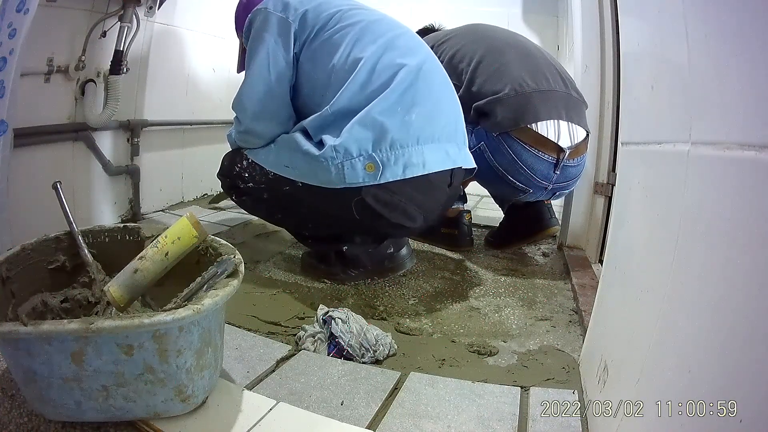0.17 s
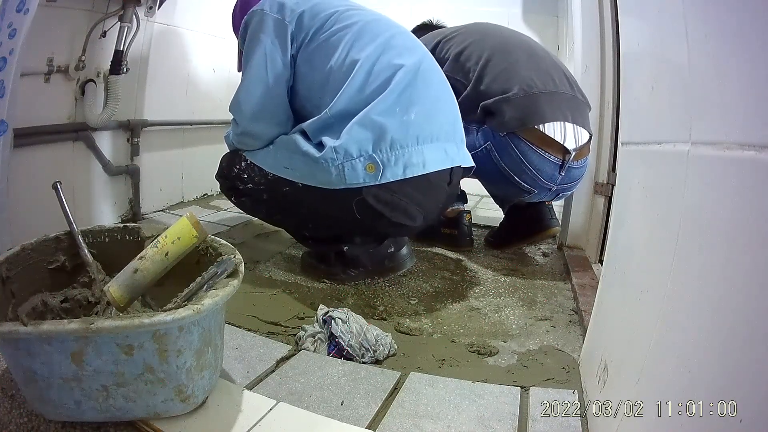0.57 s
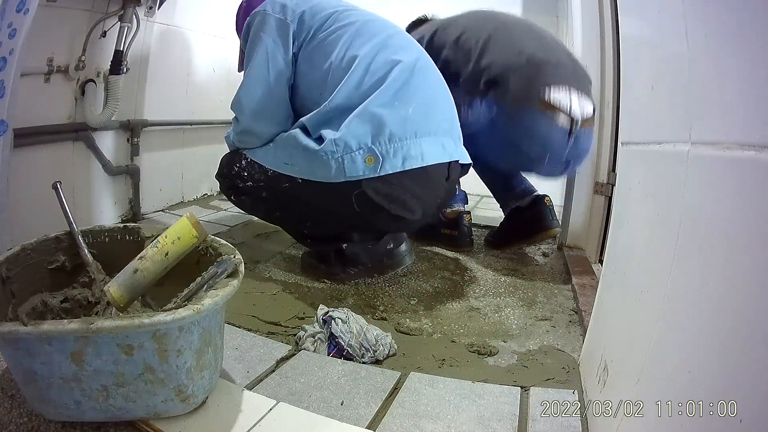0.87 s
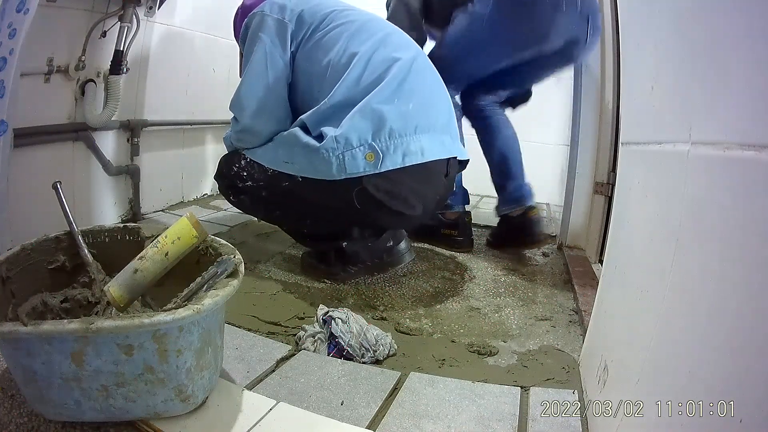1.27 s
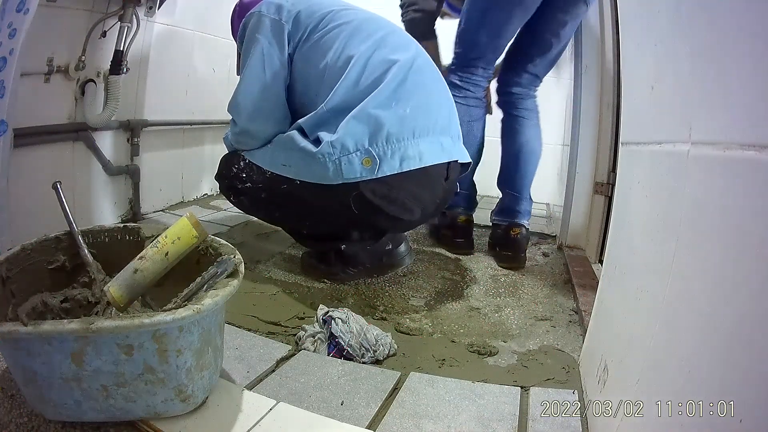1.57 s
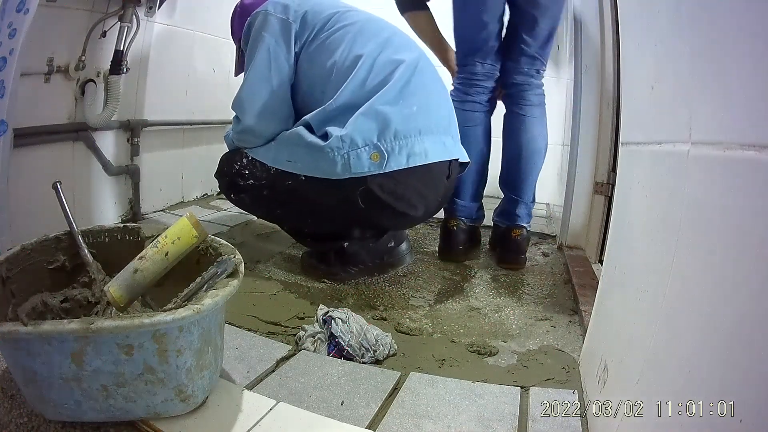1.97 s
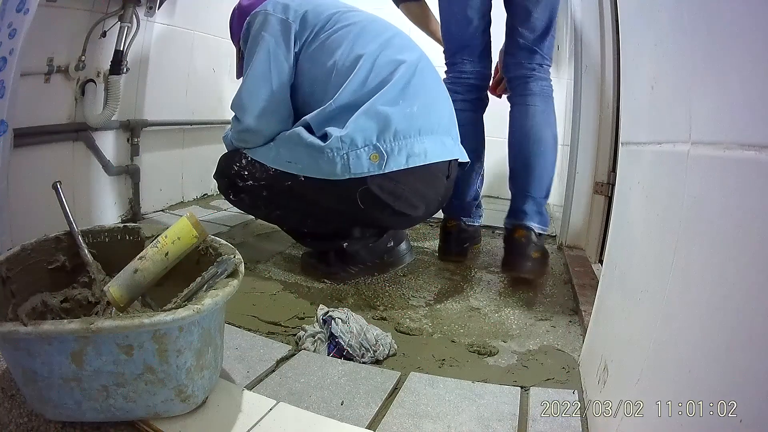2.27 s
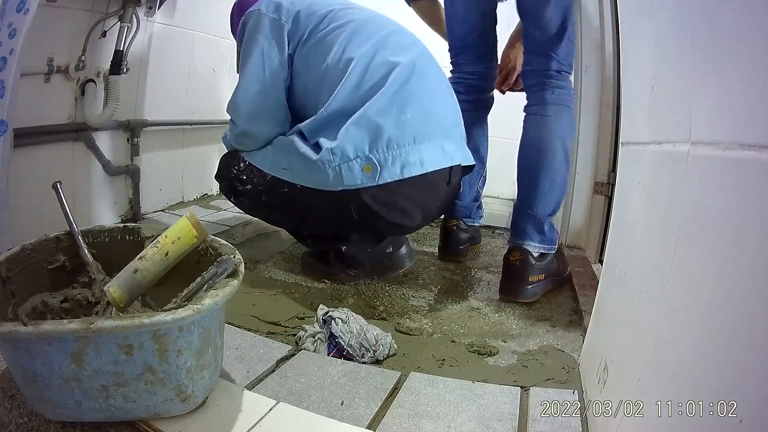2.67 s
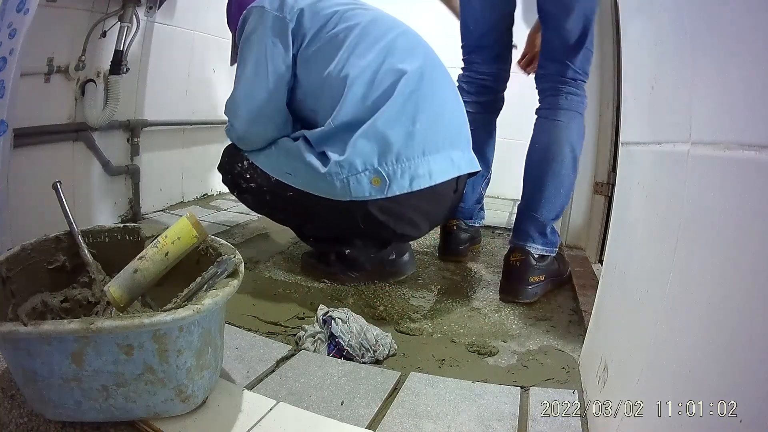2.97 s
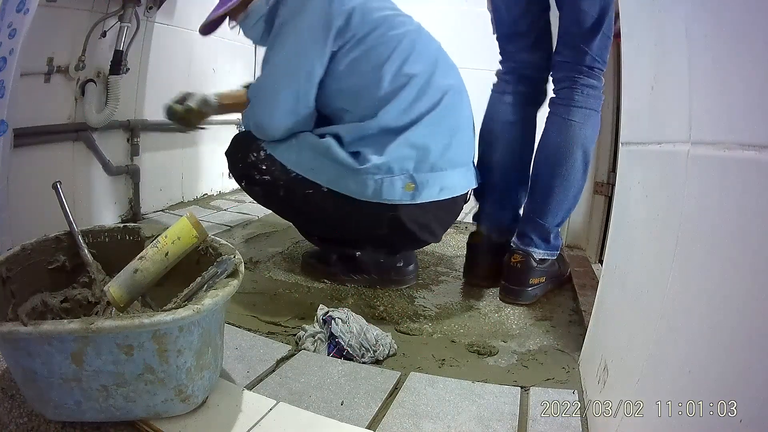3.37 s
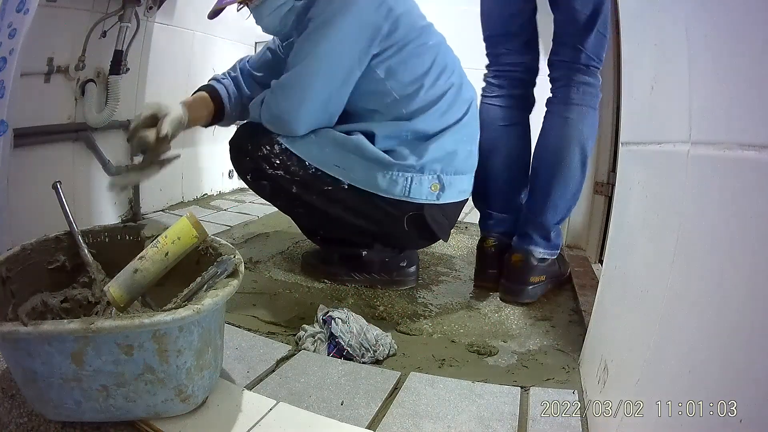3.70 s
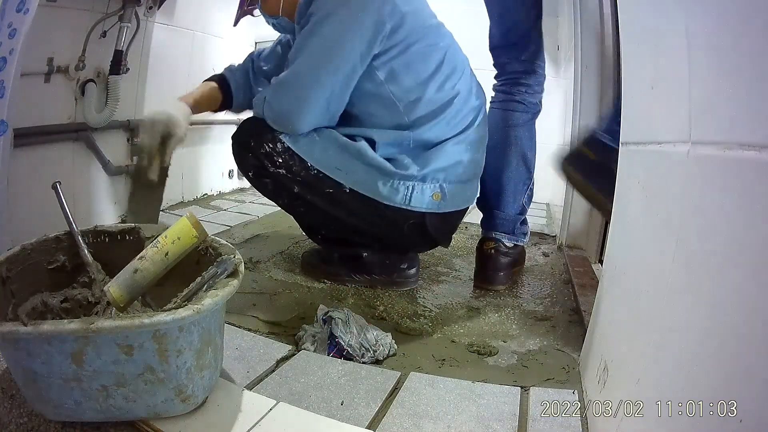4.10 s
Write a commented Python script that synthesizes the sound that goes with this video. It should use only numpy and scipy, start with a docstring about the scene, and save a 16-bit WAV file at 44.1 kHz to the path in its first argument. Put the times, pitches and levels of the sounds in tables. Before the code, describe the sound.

Low distant machine drone with a slightly unsteady hum. Close by, a trowel blade rasps over sandy wet cement in three strokes with pauses, hissing and faintly ringing. A soft double thud of a shoe comes after the second stroke. After a quiet gap, shoes knock, scuff and crackle on grit at the end. Short bright tile reflections, boxy small microphone, faint high electronic whine.

```python
"""A machinery drone and a faint brush of the edge; then three sweeps of a steel trowel over wet mortar,
in a small tiled room. Shoes tap, grit ticks, and a sole drags over sand near the end.
Grain noise drives blade, bed and sole resonances; damped modes and noise make the contacts.
The drone is shaped noise, standing-wave bands and two narrow low hums of wandering level and pitch.
A small camera adds its housing colour, a thin electronic whine and hiss."""
import sys
import numpy as np
from scipy import signal
from scipy.fft import rfft, irfft, next_fast_len
from scipy.io import wavfile
from scipy.ndimage import uniform_filter1d, map_coordinates

SR = 44100
rng = np.random.default_rng(int(sys.argv[2]) if len(sys.argv) > 2 else 0)


def bounce(signal):
    """Save signal as a 16-bit WAV file at the path given by the first command-line argument."""
    frames = np.transpose(np.atleast_2d(signal))
    limited = np.clip(frames, -1, 1)
    pcm = np.round(limited * 32767).astype(np.int16)
    wavfile.write(sys.argv[1], SR, pcm)


def level_to_linear(level):
    """Convert decibel levels to linear amplitude factors, elementwise."""
    exponent = np.asarray(level, float) / 20
    return 10 ** exponent


N = 186939
T = np.arange(N) / SR
FULL_DB = -32  # grit level at full pressure


def unit(x):
    """x at rms 1."""
    return x / np.sqrt(np.mean(x ** 2) + 1e-20)


def along(points, hz):
    """Interpolate (f/Hz, value) points on a log frequency axis."""
    f, v = np.transpose(points)
    return np.interp(np.log(hz + 1), np.log(f + 1), v)


def wobble(rate_hz):
    """Smooth random curve with rate_hz knots a second."""
    knots = rng.standard_normal(int(N * rate_hz / SR) + 4)
    return map_coordinates(knots, [T * rate_hz])


def filtered(x, response):
    """x times a complex response of frequency."""
    m = next_fast_len(N + SR // 2)
    return irfft(rfft(x, m) * response(np.fft.rfftfreq(m, 1 / SR)), m)[..., :N]


def coloured(x, spectrum):
    """x through a (f/Hz, level/dB) spectrum, rms 1."""
    return unit(filtered(x, lambda f: level_to_linear(along(spectrum, f))))


def resonances(modes):
    """Causal response of parallel (f/Hz, width/Hz, level/dB) modes."""
    return lambda f: sum(level_to_linear(db) * 1j * f * w / (c * c - f * f + 1j * f * w) for c, w, db in modes)


def gaussian(t_s, db, half_s):
    """Gaussian gain curve, down to 1/e at half_s from its peak."""
    return level_to_linear(db) * np.exp(-((T - t_s) / half_s) ** 2)


# far machinery spectrum: f/Hz, relative level/dB per Hz
DRONE_SPECTRUM = [(15, -22), (28, -12.5), (50, -40), (100, -14.5), (200, -23), (400, -21), (600, -27),
                  (780, -26.5), (1500, -28.5), (2100, -43), (4000, -53.5), (5300, -50.5), (5900, -102),
                  (9000, -94), (20000, -120)]
# room standing waves: f/Hz, width/Hz, level/dB rms
STANDING_WAVES = [(39.4, 6.3, -51.5), (69, 6.5, -43), (99.4, 2.4, -45.5), (120.6, 7.9, -43),
                  (222.6, 5.7, -46.5), (245.5, 8.6, -43), (295.3, 12, -51.5), (307.4, 10, -48),
                  (324.4, 26, -49.5), (414.7, 4.2, -51), (493.7, 7.1, -50), (544, 7.6, -49),
                  (607.3, 22, -51)]
# two narrow low hum bands, the strongest standing waves: f/Hz, resting level/dB
HUM_BANDS = [(155.8, -37.5), (173.5, -42.5)]
# chance level wander of resonance noise, lower then upper hum: peak t/s, level/dB, half length/s
HUM_LEVEL_WANDER = [
    [(.8, -33.5, 0.051), (1.17, -30, 0.053), (1.53, -31, 0.06), (2.0, -39.5, 0.18), (2.63, -27.5, 0.095),
     (3.12, -35.5, 0.085), (3.48, -34.5, 0.14), (3.95, -32, 0.26)],
    [(.4, -34, .05), (1.03, -30.5, 0.03), (1.23, -33, 0.097), (1.6, -33, 0.14), (2.5, -34, 0.23),
     (3.03, -32, 0.063), (3.29, -34, 0.068), (3.84, -29, 0.027), (4.09, -50, 0.035)],
]


def drone():
    """Far machinery: broad noise, noise in standing-wave bands, two low hums of wandering level and pitch."""
    far = level_to_linear(-39.0 + 2.2 * wobble(2.86)) * coloured(rng.standard_normal(N), DRONE_SPECTRUM)
    for hz, width_hz, db in STANDING_WAVES:
        far += level_to_linear(db) * unit(filtered(rng.standard_normal(N), resonances([(hz, width_hz, 0)])))
    for (hz, rest_db), wander in zip(HUM_BANDS, HUM_LEVEL_WANDER):
        level = level_to_linear(rest_db + 2.1 * wobble(11)) + sum(gaussian(*row) for row in wander)
        drift_hz = 1.063 * wobble(7)  # pitch wanders inside the resonance
        cycles = np.cumsum(hz + drift_hz) / SR + rng.random()
        far += level * np.sin(2 * np.pi * cycles)
    return far


# electronic hiss spectrum: f/Hz, relative level/dB per Hz
HISS_SPECTRUM = [(3000, -13), (7000, 8), (12000, -18), (15000, 5), (15700, -14)]


def hiss():
    """Electronic noise: steady shaped noise."""
    return level_to_linear(-79) * coloured(rng.standard_normal(N), HISS_SPECTRUM)


def whine():
    """Switching tone whose phase flips back and forth, with a weak steady octave."""
    whine_hz, flip_hz, flip_rad = 7322.4, 27.95, 1.23
    flip = flip_rad * np.tanh(12 * np.sin(2 * np.pi * (flip_hz * T + rng.random())))
    tone = level_to_linear(-65.5) * np.sin(2 * np.pi * whine_hz * T + flip)
    octave = level_to_linear(-85) * np.sin(4 * np.pi * whine_hz * T)
    return tone + octave


# camera housing modes: f/Hz, width/Hz, level/dB
HOUSING_MODES = [(1690, 580, -3), (2733, 460, 0), (4687, 930, 5.5), (6380, 340, 3), (8000, 660, -6),
                 (9600, 490, -8), (12100, 1300, -9)]


def housing(x):
    """The housing resonates in parallel with a direct path and a first-order low-pass path."""
    modes = resonances(HOUSING_MODES)
    return filtered(x, lambda f: level_to_linear(-3) / (1 + 1j * f / 6000) + .3 + modes(f))


# tile reverberation: f/Hz, t60/s
TILE_DECAY = [(200, 0.11), (2000, 0.25), (10000, 0.088)]


def room(x):
    """Tiled walls: a noise tail in which each frequency dies at its own speed."""
    hz, t, z = signal.stft(rng.standard_normal(SR // 2), SR, nperseg=256)
    decay = level_to_linear(-60 * t / along(TILE_DECAY, hz)[:, None])
    tail = signal.istft(z * decay, SR, nperseg=256)[1]
    delayed = np.pad(x, (150, 0))  # samples
    return signal.fftconvolve(delayed, tail / np.linalg.norm(tail))[:N]


def floor_bounce(x):
    """A delayed floor reflection, stronger with frequency, combs the treble."""
    comb_hz = 1650  # inverse delay
    return filtered(x, lambda f: 1 + 0.16 * np.exp(-2j * np.pi * f / comb_hz) * f / (f + 4000))


def contacts(events, sound, rise_s):
    """Each (t/s, level/dB, ..) event plays its own sound(t, ..) with a short rise."""
    out, t = np.zeros(N + SR), np.arange(SR // 4) / SR
    for t_s, db, *kind in events:
        out[round(t_s * SR):][:len(t)] += level_to_linear(db) * (1 - np.exp(-t / rise_s)) * sound(t, *kind)
    return out[:N]


def soft(x, cutoff_hz):
    """A soft contact passes little treble: third-order low-pass."""
    return filtered(x, lambda f: 1 / (1 + 1j * f / cutoff_hz) ** 3)


def tick(t, hz, t60_s):
    """A grain snaps: one damped mode and a noise crack, weaker in longer ringers."""
    t60_s = max(t60_s, .004)
    crack = level_to_linear(-3) * (.025 / t60_s) ** 2.4 * rng.standard_normal(len(t))
    return level_to_linear(-60 * t / t60_s) * (np.sin(2 * np.pi * hz * t) + crack)


# grit ticks: t/s, level/dB, f/Hz, t60/s
GRIT_TICKS = [(.2255, -44, 4900, 0.022), (1.068, -46, 3120, 0.027), (1.1234, -35, 3080, 0.027),
              (2.0473, -47, 2700, .028), (3.606, -48, 6300, .025), (3.7803, -42, 3060, 0.018),
              (3.8274, -56, 2460, .024), (3.861, -48, 5000, .02), (3.949, -46, 6540, .02),
              (4.0305, -34, 2870, 0.049), (4.031, -37.5, 4770, 0.046), (4.04, -32, 5050, 0.04)]


def ticks():
    """Single grains snap as short, bright damped modes."""
    return soft(contacts(GRIT_TICKS, tick, rise_s=0.0002), cutoff_hz=9050)


# floor modes: f/Hz, level/dB, t60/s at ring time factor 1
FLOOR_MODES = [(171, -6.5, 0.065), (285, 4, 0.061), (388, -2, 0.069), (500, 3.5, 0.039), (735, -1, 0.038),
               (983, 2.5, 0.051), (1283, -1, 0.031), (1587, 3, 0.033)]


def tap(t, hz, lasting):
    """Floor modes nearest the contact's hardness hz ring most, under a burst of noise."""
    db_per_octave, crack_db, crack_t60_s = 15, -2.5, 0.082
    u = t / max(lasting, .1)
    ring = 0
    for mode_hz, db, t60_s in FLOOR_MODES:
        off_db = db_per_octave * abs(np.log2(mode_hz / hz))
        ring += level_to_linear(db - off_db - 60 * u / max(t60_s, .004)) * np.sin(2 * np.pi * mode_hz * t)
    crack = level_to_linear(crack_db - 60 * u / crack_t60_s) * hz / 900 * rng.standard_normal(len(t))
    return ring + crack


# dull contacts: t/s, level/dB, strongest f/Hz (harder is higher), ring time factor
FLOOR_TAPS = [(1.065, -21, 417, 1.5), (1.7765, -12, 684, 0.55), (1.788, -17.5, 563, 0.42),
              (1.8, -30, 500, .5), (3.828, -26, 1200, 0.65), (3.829, -21, 402, 0.85),
              (3.834, -14, 228, 0.71), (3.884, -23, 346, 1.2), (3.9, -15.5, 1420, 1),
              (3.953, -28, 300, 1.2), (3.952, -28, 1100, 0.69), (4.017, -15, 1220, 1.36),
              (4.03, -22.5, 553, 1.9)]


def taps():
    """Dull contacts ring the floor."""
    return soft(contacts(FLOOR_TAPS, tap, rise_s=0.0017), cutoff_hz=1100)


def grains(spread_db, clump_db):
    """Dense sand-grain impacts of uneven size that come in clumps, rms 1."""
    size_db = spread_db * rng.standard_normal(N) + clump_db * wobble(110)
    return unit(rng.standard_normal(N) * level_to_linear(size_db))


def pressure(strokes):
    """Contact pressure, dB re FULL_DB; contact begins and ends within milliseconds."""
    gain = sum(level_to_linear(np.interp(T, *np.transpose(rows)[:2], -120, -120)) for rows in strokes)
    return 20 * np.log10(uniform_filter1d(gain, size=70) + 1e-9) - FULL_DB


def follows(db, slope):
    """Layer gain: slope dB per dB of pressure, zero out of contact."""
    return level_to_linear(FULL_DB + slope * db) * (db > -60)


def third_column(strokes):
    """Third column of the stroke tables against time, dB."""
    return np.interp(T, *np.vstack(strokes).T[::2])


# shoe dragging over sandy tiles: t/s, drag as grit level/dB, load as extra sole level/dB
SHOE_DRAG = [
    [(3.74, -75, -3), (3.76, -64, 0), (3.825, -62, 1), (3.86, -59, 0), (3.876, -51, 1), (3.905, -52.5, 1),
     (3.93, -52, -4), (3.95, -49, 4), (4.0, -45, -5.5), (4.025, -40, 4), (4.06, -49.5, 0.5), (4.12, -61, 4),
     (4.17, -76, 4)],
]
# faint shifts of weight on the sand: t/s, level/dB, half length/s
WEIGHT_SHIFTS = [(1.786, -67, 0.018), (3.14, -73, .03), (3.375, -71, 0.023)]
# fine grit, scuff and sole-body spectra: f/Hz, relative level/dB per Hz
SAND_SPECTRUM = [(6000, -7), (7500, 0), (10000, 3), (12000, 1), (13200, -16), (15500, -30)]
SCUFF_SPECTRUM = [(1800, 1), (2300, -4), (4000, -9.5), (6000, -11.5), (8000, -33)]
SOLE_SPECTRUM = [(250, -39), (400, 6), (800, -0.5), (1300, 1), (1800, -9.5), (2100, -42)]


def shoe():
    """Grains under a rubber sole: fine grit, scuff and the sole's body, each following the drag."""
    sand = grains(spread_db=5.5, clump_db=2.0)
    grit = coloured(sand, SAND_SPECTRUM)
    rustle = sum(gaussian(*row) for row in WEIGHT_SHIFTS) * grit
    drag_db = pressure(SHOE_DRAG)
    fine = level_to_linear(-8.5) * follows(drag_db, 0.87) * grit
    scuff = level_to_linear(-3) * follows(drag_db, 0.9) * coloured(sand, SCUFF_SPECTRUM)
    sole_db = 3.5 + third_column(SHOE_DRAG)
    sole = level_to_linear(sole_db) * follows(drag_db, 0.69) * coloured(sand, SOLE_SPECTRUM)
    return rustle + fine + scuff + sole


# strokes: t/s, edge pressure as grit level/dB, flex as extra ring level/dB (hand bends blade into bed)
TROWEL_STROKES = [
    [(.258, -47, -2), (.284, -38, -0.5), (.315, -29.5, -4), (.39, -36, 5), (.43, -45, -1.5), (.53, -70, 4)],
    [(1.123, -47, 4.5), (1.135, -36, 1), (1.165, -33.5, -1.5), (1.22, -32, 2), (1.275, -28.5, -0.5),
     (1.34, -34.5, 0.5), (1.39, -35.5, 0.5), (1.43, -28.5, -0.5), (1.478, -36.5, 0), (1.49, -41, -2),
     (1.6, -64, 1)],
    [(2.108, -47, -4), (2.15, -41.5, 0), (2.19, -39, 0), (2.26, -34, 3), (2.36, -32.5, -1.5),
     (2.45, -32.5, -0.5), (2.5, -35, -1), (2.57, -34, 4.5), (2.61, -43.5, 3), (2.7, -67.5, 6)],
]
# edge brushes the mortar before a stroke: t/s, grit level/dB
EDGE_TOUCHES = [(0.0, -53.5), (0.225, -47), (1.067, -45.5), (2.047, -51.5)]
# grit spectrum: f/Hz, relative level/dB per Hz
GRIT_SPECTRUM = [(1500, -6), (2300, 8), (3500, -5.5), (4100, 1), (8000, -4), (11900, -3), (12950, -21),
                 (13800, -11), (15600, -30)]
# blade modes damped by mortar: f/Hz, width/Hz, level/dB
BLADE_MODES = [(1172, 73, 4.5), (1305, 70, 9), (1480, 110, 1.5), (1580, 100, 9), (1715, 31, 6.5),
               (1960, 290, 6.5)]
# blade radiation: f/Hz, relative level/dB
BLADE_RADIATION = [(700, -30), (950, -2), (1100, 1), (1800, 1.5), (2050, -27.5), (3000, -8.5)]
# floor under the blade: f/Hz, width/Hz, level/dB
BED_MODES = [(276, 15, -16), (275, 33, -1), (414, 69, -6), (514, 97, -7), (590, 31, 1.5), (670, 36, -19)]


def trowel():
    """Sand under the edge hisses, rings the blade and shakes the mortar bed."""
    touch_s, fade_db_per_s = .1, 198
    ring_db, bed_db, bed_db_per_flex_db = 0.5, -1.5, 0.91  # levels over grit at full pressure
    sand = grains(spread_db=3.5, clump_db=0.54)
    ring = coloured(filtered(sand, resonances(BLADE_MODES)), BLADE_RADIATION)
    bed = unit(filtered(grains(spread_db=3.5, clump_db=0.6), resonances(BED_MODES)))
    brushes = [[(t_s, db), (t_s + touch_s, db - touch_s * fade_db_per_s)] for t_s, db in EDGE_TOUCHES]
    edge_db = pressure(TROWEL_STROKES + brushes)
    flex_db = third_column(TROWEL_STROKES)
    hissing = level_to_linear(-5.0) * follows(edge_db, 0.96) * coloured(sand, GRIT_SPECTRUM)
    ringing = level_to_linear(ring_db + flex_db) * follows(edge_db, 0.81) * ring
    shaking = level_to_linear(bed_db + bed_db_per_flex_db * flex_db) * follows(edge_db, 0.81) * bed
    return hissing + ringing + shaking


def scene():
    """Near sounds arrive directly and off the tiles, trowel and shoe also off the floor, over the drone."""
    near = floor_bounce(trowel() + shoe()) + ticks() + taps()
    return (level_to_linear(1.0) * near + level_to_linear(-4.0) * room(near) + drone())[None]


def low_pass(x):
    """Removes everything above the highest recorded frequency."""
    return signal.sosfilt(signal.butter(12, 15630, fs=SR, output="sos"), x)


def record(dry):
    """The housing colours the scene; the electronics add whine and hiss."""
    mix = housing(dry) + whine() + hiss()
    return low_pass(mix)


dry = scene()
out = record(dry)
bounce(out)
```